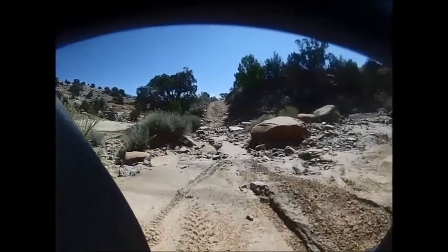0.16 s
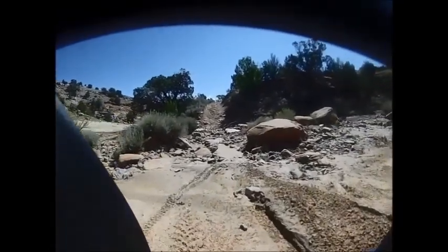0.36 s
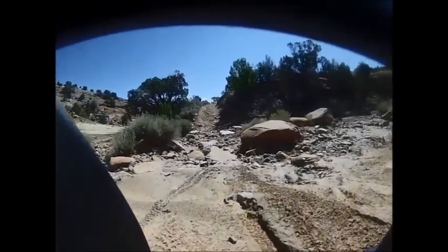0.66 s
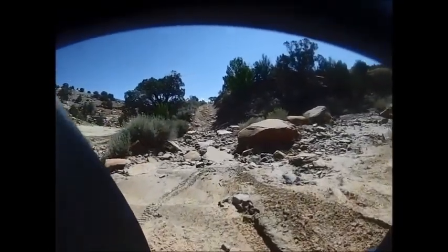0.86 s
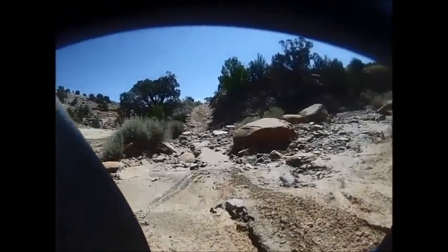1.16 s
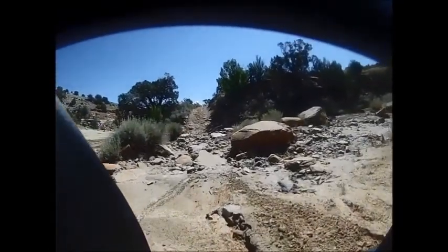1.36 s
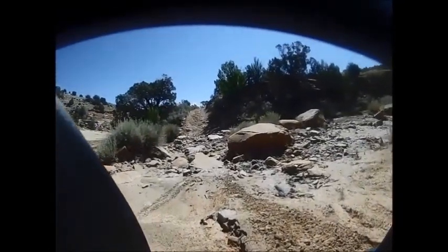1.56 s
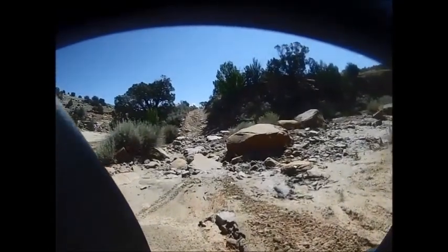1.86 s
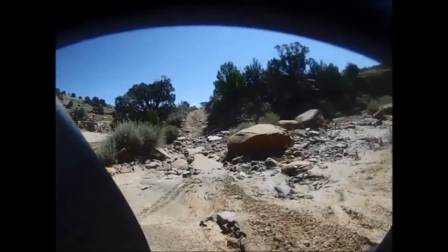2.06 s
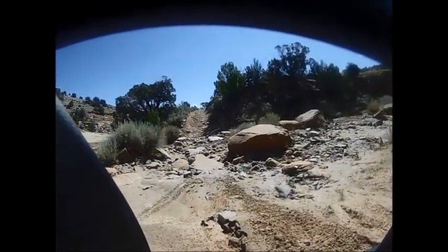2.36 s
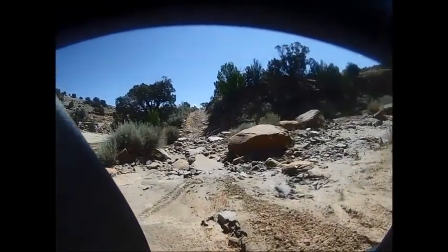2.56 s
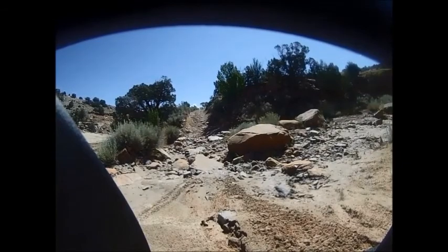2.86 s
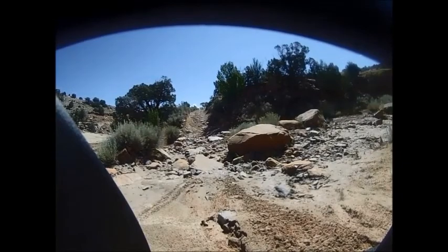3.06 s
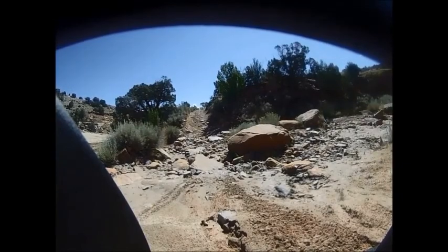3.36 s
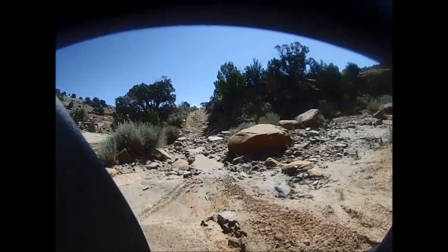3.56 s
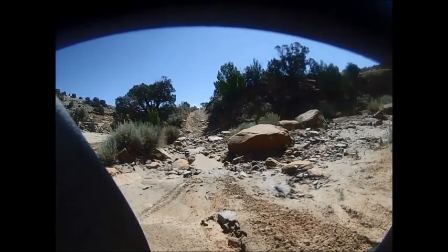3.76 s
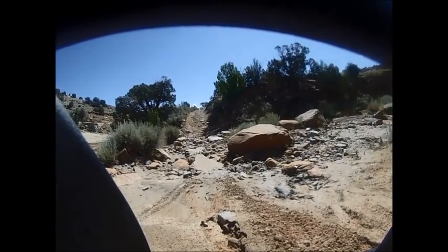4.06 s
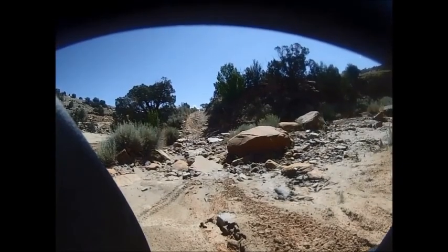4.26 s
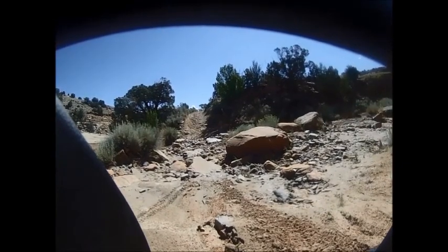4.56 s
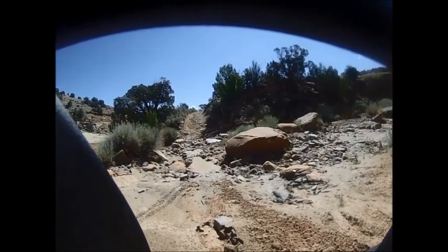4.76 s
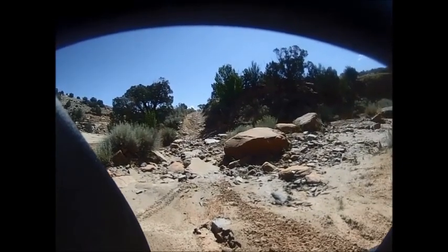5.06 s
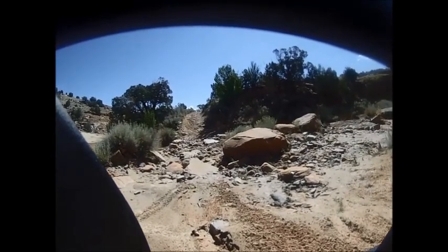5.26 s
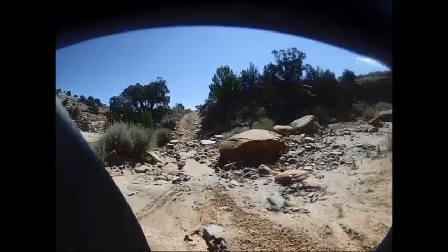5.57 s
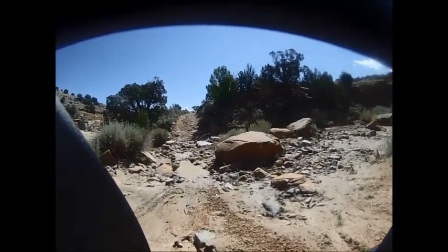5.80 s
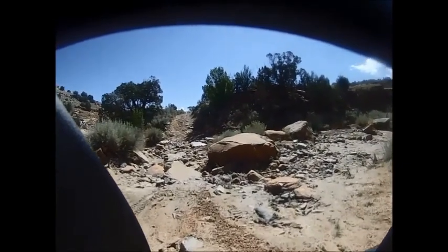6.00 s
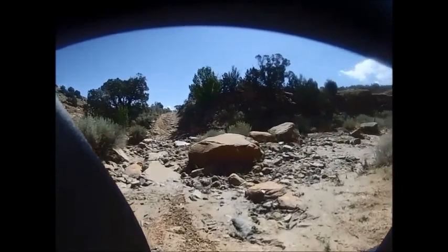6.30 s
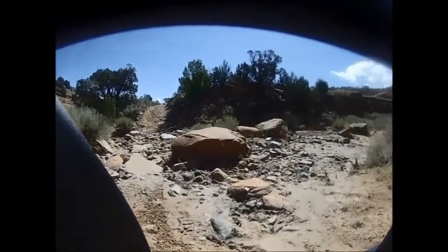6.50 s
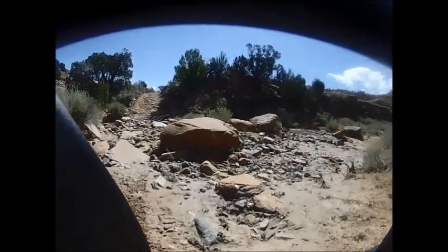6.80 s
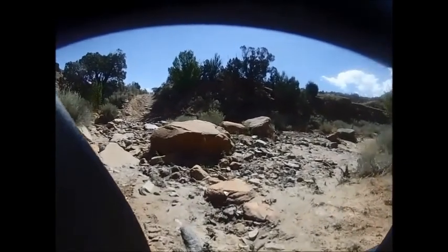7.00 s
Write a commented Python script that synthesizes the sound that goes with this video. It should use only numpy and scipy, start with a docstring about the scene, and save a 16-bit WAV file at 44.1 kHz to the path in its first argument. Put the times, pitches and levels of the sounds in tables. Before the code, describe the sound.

An off-road vehicle crawls along a rocky dry wash, heard from on board. For the first 3.6 seconds its engine putters near idle with low, lumpy exhaust pulses, light ticking and clatter, and an uneven rumble from rolling over the ground. At about 3.7 seconds the engine rises in pitch and gets much louder, with a shudder and a dull double clunk just after 4 seconds. It pulls with a deep drone until about 6.3 seconds, while rapid knocks from the drive keep time with it. Two small stones snap under the tyres at about 6.1 and 6.3 seconds. From 6.2 to 6.5 seconds the knocking turns harder and brighter as the revs drop with another shudder. A few loose clunks and scattered knocks follow around 6.6 to 6.7 seconds, and the engine is back to a low putter by 7 seconds.

```python
"""A twin-cylinder off-road vehicle crawls along a rocky wash, heard from on board.
Its exhaust putters near idle, pulls for 2.5 s with a deep drone, then falls back. The engine shakes
the bodywork, valve gear and drive clatter through the casing, and the frame rumbles over the ground.
Slack in the drive knocks in step with the engine under load, harder and brighter as it slows.
The running gear clunks as the load comes and goes; two stones snap under the tyres."""
import sys
import numpy as np
from scipy import signal
from scipy.fft import rfft, irfft, next_fast_len
from scipy.io import wavfile
from scipy.ndimage import uniform_filter1d, minimum_filter1d, map_coordinates

SR = 44100
rng = np.random.default_rng(int(sys.argv[2]) if len(sys.argv) > 2 else 0)


def inscribe(sig):
    """Save sig as 16-bit PCM at rate SR to the path in sys.argv[1].

    A 1-D sig is mono; a 2-D sig holds one channel per row.
    Samples are clipped to [-1, 1] before scaling.
    """
    pcm = np.round(np.clip(np.atleast_2d(sig).T, -1, 1) * 32767)
    wavfile.write(sys.argv[1], SR, pcm.astype(np.int16))


N = 314874
TIME = np.arange(N) / SR


def amp(db):
    """Decibels to gain."""
    return 10 ** (np.asarray(db) / 20)


def unit(x):
    """Scale to rms 1."""
    return x / np.sqrt(np.mean(x ** 2) + 1e-20)


def curve(points):
    """(t/s, value) points to one value per sample."""
    return np.interp(TIME, *np.transpose(points))


def swells(events):
    """Gaussian bumps in dB from (t/s, width/s, lift/dB) rows."""
    return sum(db * np.exp(-.5 * ((TIME - s) / width_s) ** 2) for s, width_s, db in events)


def wobble(rate_hz):
    """Smooth random curve, rms about 1."""
    knots = rng.standard_normal(int(N * rate_hz / SR) + 4)
    return np.interp(TIME, TIME[::64], map_coordinates(knots, [TIME[::64] * rate_hz]))


def gate(cycle, moments):
    """Gaussian bumps that recur every engine cycle."""
    return sum(size * np.exp(-.5 * (((cycle - phase + .5) % 1 - .5) / width) ** 2)
               for phase, width, size in moments)


def once_a_cycle(cycle, phase):
    """Times in s at which the engine passes one phase of its cycle."""
    return np.interp(np.arange(int(cycle[-1])) + phase, cycle, TIME)


def ring(x, colour, modes=(), size=8192):
    """Minimum-phase body: a (f/Hz, level/dB) colour plus resonance peaks."""
    hz = np.fft.rfftfreq(size, 1 / SR)
    colour_hz, colour_db = np.transpose(colour)
    gain_db = np.interp(np.log(hz + 1), np.log(colour_hz), colour_db)
    gain_db += sum(db / (1 + (2 * (hz - centre) / width) ** 2) for centre, width, db in modes)
    cepstrum = irfft(np.log(amp(gain_db)))
    cepstrum[1:size // 2] *= 2
    cepstrum[size // 2 + 1:] = 0
    return signal.fftconvolve(x, irfft(np.exp(rfft(cepstrum))))[:N]


# casing and bodywork resonances: f/Hz, width/Hz, lift/dB
CASING_MODES = [(303.1, 11, 9.5), (554, 20, 6), (748, 37, 4), (998.6, 63, 9.5), (1187, 59, 6.5),
                (1356, 150, 6.5), (1575, 76, 7), (1755.5, 116, 13.5), (2046, 69, 8), (2226, 190, 7.5),
                (2643, 20, 10), (3610, 32, 8), (4223, 73, 11), (4340, 156, 14), (4576, 110, 12.5),
                (5330, 95, 9.5), (6000, 75, 0.5), (6900, 60, -0.5)]


def casing(x, colour, tune=1):
    """Casing and bodywork ring at their resonances, scaled in pitch by tune; rms 1."""
    modes = [(tune * hz, width_hz, db) for hz, width_hz, db in CASING_MODES]
    return unit(ring(x, colour, modes))


def puffs(cycle, orders, levels_db, crest_phase, spread, smear, uneven_db, jitter_cycles):
    """Uneven exhaust pulses: low orders crest together, pipe reflections smear the higher ones."""
    pressure = 0
    phase = cycle - crest_phase + jitter_cycles * wobble(22)
    for k, db in zip(orders, levels_db):
        lag = spread * max(k - 4, 0) ** 2 + smear * max(k - 7, 0) ** 2
        size = amp(db + uneven_db * np.sqrt(k) * np.tanh(wobble(7.5)))
        pressure += size * np.cos(2 * np.pi * (k * phase - lag))
    return unit(pressure)


# exhaust harmonics: order of the cycle rate, rolling idle/dB, held idle/dB, open throttle/dB
EXHAUST_ORDERS = [(2, -24.5, -26.5, 6), (3, -26.5, -7.5, -5), (4, 5.5, 3.5, 3.5), (5, 0, -12, -5),
                  (6, -4, -6, -17), (7, -11, -4.5, -22), (8, -12.5, -7.5, -20.5), (9, -25, -14.5, -26.5),
                  (10, -28.5, -14.5, -25.5), (11, -15.5, -14.5, -23.5), (12, -21.5, -21, -24.5),
                  (13, -33, -32.5, -28), (14, -18.5, -26.5, -31.5), (15, -28, -15, -24.5),
                  (16, -28, -14.5, -24.5), (17, -32, -28.5, -32.5), (18, -34.5, -26.5, -27.5)]


def exhaust(cycle, throttle, held):
    """Lumpy suction pulses at idle, gruffer when held back; firm, even pushes under load."""
    orders, rolling_db, held_db, open_db = np.transpose(EXHAUST_ORDERS)
    idle_db = (rolling + held * (braked - rolling) for rolling, braked in zip(rolling_db, held_db))
    idle = -puffs(cycle, orders, idle_db, crest_phase=0.3518, spread=0.012, smear=0.212,
                  uneven_db=1.15, jitter_cycles=0.005)
    pull = puffs(cycle, orders, open_db, crest_phase=0.5496, spread=0.0081, smear=0.23,
                 uneven_db=0.3, jitter_cycles=0.0015)
    return ((1 - throttle) * idle + throttle * pull) / np.hypot(1 - throttle, throttle)


# spectra of the bodywork drone and the gas turbulence: f/Hz, level/dB
DRONE_COLOUR = [(60, -28), (110, -8), (150, -5.5), (220, 0.5), (260, -0.5), (350, -4.5), (430, -5.5),
                (520, -14.5), (580, -15), (700, -24.5), (1200, -73), (3000, -110)]
GAS_COLOUR = [(60, -20), (110, -8), (160, 0), (230, 1.5), (280, -3.5), (350, -5.5), (430, -7), (520, -19.5),
              (700, -24.5), (1200, -67.5), (3000, -110)]


def boom(cycle, shudder_db, rumble_gain=0.79, waver_db=6.0, jitter_cycles=0.002):
    """High engine orders shake the bodywork, over a turbulent rumble that surges with each shudder."""
    shaft = cycle + jitter_cycles * wobble(20)
    drone = 0
    for order in range(19, 47):
        size = amp(waver_db * np.tanh(wobble(6.5)))
        drone += size * np.cos(2 * np.pi * (order * shaft + rng.random()))
    rumble = amp(shudder_db) * casing(rng.standard_normal(N), GAS_COLOUR)
    return (casing(drone, DRONE_COLOUR) + rumble_gain * rumble) / np.hypot(1, rumble_gain)


def panel_hum(cycle, cycle_hz, held, order=24, panel_hz=304, width_hz=28, hum_db=-50, held_db=2.5):
    """A panel sings while idle speed keeps one engine order near its resonance."""
    nearness = 1 / (1 + ((order * cycle_hz - panel_hz) / width_hz) ** 2)
    level = amp(hum_db + held_db * held + 3 * np.tanh(wobble(7)))
    shaft = cycle + 0.0025 * wobble(12)
    return level * nearness * np.sqrt(2) * np.cos(2 * np.pi * order * shaft)


def wavering_casing(x, colour, detune=0.015):
    """The casing's ring wavers between slightly sharp and slightly flat; rms 1."""
    share = .5 + .5 * np.tanh(2 * wobble(9))
    return unit(share * casing(x, colour, 1 + detune) + (1 - share) * casing(x, colour, 1 - detune))


# clatter bursts at the firings and the dead centres: phase/cycles, width/cycles, strength
FIRINGS = [(0.075, 0.11, 0.33), (0.515, 0.091, 0.34)]
DRIVE_CHATTER = [(.02, 0.11, 0.4), (0.268, 0.05, 0.72), (.53, 0.05, 0.93), (0.811, 0.067, 0.43)]
# clatter spectra at idle and under load: f/Hz, level/dB
IDLE_COLOUR = [(200, -28), (450, -1.5), (620, -8), (780, -1.5), (1100, -3), (1600, -2), (1950, -10),
               (2300, -9), (2800, -9.5), (3700, -23.5), (4400, -30.5), (5200, -38.5), (8000, -38.5),
               (15000, -49)]
LOAD_COLOUR = [(200, -26.5), (450, -27), (620, -10), (780, -3.5), (1100, -10.5), (1350, -2.5), (1650, -6.5),
               (1950, -13.5), (2700, -10), (3100, -15), (3900, -27.5), (7300, -35.5), (8300, -44),
               (15000, -58.5)]


def clatter(cycle, throttle, grain_db=1.1, idle_db=-0.44, load_db=-2.5, slack_throttle=0.22):
    """Dense small impacts of valve gear and drive: at the firings idling, at dead centres under load."""
    impacts = rng.standard_normal(N) * amp(grain_db * wobble(600))
    idle = amp(idle_db) * wavering_casing(impacts * (0.38 + gate(cycle, FIRINGS)), IDLE_COLOUR)
    pull = amp(load_db) * wavering_casing(impacts * (0.6 + gate(cycle, DRIVE_CHATTER)), LOAD_COLOUR)
    load = np.clip((throttle - slack_throttle) / (1 - slack_throttle), 0, 1)
    return (1 - load) * idle + load * pull


# valve seatings: phase/cycles, relative level/dB
SEATINGS = [(.005, -4.5), (.135, 2.5), (.385, -2), (.56, 1)]
# tick spectrum: f/Hz, level/dB
TAPPET_COLOUR = [(300, -30.5), (800, 1.5), (1600, 3), (2000, 0), (2700, -8), (3700, -22), (5200, -29.5),
                 (8000, -35.5), (15000, -47)]


def tappets(cycle, rms_db=-50, scatter_db=2, jitter_s=0.0009):
    """Each valve seats with a small, bright tick that rings the casing."""
    ticks = np.zeros(N)
    for phase, db in SEATINGS:
        times_s = once_a_cycle(cycle, phase)
        times_s += jitter_s * rng.standard_normal(len(times_s))
        samples = np.clip((times_s * SR).astype(int), 0, N - 1)
        ticks[samples] += amp(db + scatter_db * rng.uniform(-0.83, 1, len(samples)))
    return amp(rms_db) * casing(ticks, TAPPET_COLOUR)


# gas bursts at the valves: phase/cycles, width/cycles, strength
VALVE_BURSTS = [(0.428, 0.039, 0.48), (0.561, 0.2, 0.32), (.94, 0.059, 0.52)]
# hiss spectrum: f/Hz, level/dB
HISS_COLOUR = [(2500, -34), (3750, -5.5), (4300, 2), (6000, 0), (7450, -5), (7950, -12), (15000, -20.5)]


def valve_hiss(cycle, throttle, bed=0.44, hiss_db=-68, throttle_db=3):
    """Gas sizzles as the valves open and close."""
    gas = rng.standard_normal(N) * (bed + gate(cycle, VALVE_BURSTS))
    return amp(hiss_db + throttle_db * throttle) * unit(ring(gas, HISS_COLOUR))


def chassis(rumble_db=-39, lumps_db=5.5):
    """The frame rumbles as the tyres roll over uneven ground."""
    colour = [(18, -21.5), (32, -3), (55, 11), (95, 1), (140, -9), (300, -46.5), (1000, -110)]
    return amp(rumble_db + lumps_db * wobble(4.9)) * unit(ring(rng.standard_normal(N), colour))


def strikes(events, colour, grit, grit_t60_s, rebound, rebound_s):
    """Each contact is a clean blow, a quick rebound and decaying grit, ringing one body."""
    t = np.arange(1024) / SR
    response = ring(np.ones(1), colour)[:len(t)]
    force = np.zeros(N + SR)
    for s, db in events:
        blow = grit * rng.standard_normal(len(t)) * amp(-60 * t / grit_t60_s)
        blow[0] += 1
        blow[int(rebound_s * SR)] += rebound
        force[int(s * SR):][:len(t)] += amp(db) * blow
    return signal.fftconvolve(force, response / np.abs(response).max())[:N]


# running gear blows: t/s, level/dB
CLUNKS = [(4.039, -30.5), (4.089, -20), (6.617, -23.5), (6.702, -18.5), (6.718, -24)]
# clunk spectrum: f/Hz, level/dB
CLUNK_COLOUR = [(100, -10.5), (310, 1), (700, -5), (1000, -7), (1290, 7.5), (1700, 0), (2200, -5),
                (3200, -20), (4500, -21), (8000, -47.5)]


def clunks():
    """Dull, loose blows from the running gear as the load comes on and goes off."""
    return strikes(CLUNKS, CLUNK_COLOUR, grit=0.06, grit_t60_s=0.035, rebound=0.4, rebound_s=0.003)


# once-a-cycle knocks near a dead centre: start/s, end/s, phase/cycles, level/dB
KNOCK_RUNS = [(4.12, 5.0, .765, -18.7), (4.16, 5.06, .495, -15.3), (5.06, 5.75, .487, -16.3),
              (4.68, 4.92, .225, -20.5), (5.2, 5.5, .21, -23.5), (5.5, 5.75, .21, -19.5),
              (5.5, 5.76, .0, -19.5), (5.5, 5.75, .7, -21), (5.75, 5.92, .703, -15.5),
              (5.82, 5.97, .0, -19.5), (5.92, 6.2, .733, -18.2), (6.0, 6.18, .25, -22)]
# harder and softer spells in those runs: t/s, width/s, lift/dB
KNOCK_ACCENTS = [(4.17, 0.024, -4.5), (4.55, 0.011, 1), (4.66, 0.024, 2.5), (4.82, 0.046, -3),
                 (5.0, 0.032, 1.5), (5.21, 0.04, -6.5), (5.35, 0.062, 2.5), (5.945, 0.012, -2.5)]
# harder knocks, still in step with the slowing engine, then a few scattered ones: t/s, level/dB
OVERRUN_KNOCKS = [(6.103, -17.5), (6.215, -13), (6.241, -13), (6.253, -26), (6.265, -11.5), (6.28, -15.5),
                  (6.293, -14), (6.308, -24), (6.319, -16.5), (6.334, -15.5), (6.35, -17), (6.365, -12),
                  (6.408, -12.5), (6.426, -16.5), (6.456, -25), (6.533, -30), (6.569, -16.5), (6.6, -26),
                  (6.635, -21), (6.651, -23), (6.666, -20), (6.704, -21), (6.733, -24), (7.122, -21.5)]
# knock spectrum, and the added brightness on the overrun: f/Hz, level/dB
KNOCK_COLOUR = [(300, -33), (740, -1.5), (880, -10), (1100, -12.5), (1300, 0), (1480, -2.5), (1720, 0),
                (2050, -10), (2400, -2), (2620, 3), (2770, 0), (2950, -19.5), (3230, -12), (3450, -22.5),
                (3750, -39.5), (5400, -32.5), (7000, -57), (15000, -90)]
OVERRUN_LIFT = [(2800, -1.5), (3400, 0), (4500, 4.5), (5600, 0.5), (7200, 8.5), (9000, 2)]


def drive_knocks(cycle):
    """Slack in the drive is taken up in step with the engine, harder and brighter on the overrun."""
    accent_db = swells(KNOCK_ACCENTS)
    load_knocks = [(s, db + accent_db[int(s * SR)]) for start_s, end_s, phase, db in KNOCK_RUNS
                   for s in once_a_cycle(cycle, phase) if start_s < s < end_s]
    contact = dict(grit=0.04, grit_t60_s=0.025, rebound=0.12, rebound_s=0.0023)
    under_load = strikes(load_knocks, KNOCK_COLOUR, **contact)
    overrun = strikes(OVERRUN_KNOCKS, KNOCK_COLOUR, **contact)
    return under_load + ring(overrun, OVERRUN_LIFT)


# stone snaps: t/s, level/dB
STONES = [(6.062, -32), (6.341, -42)]


def stones():
    """Stones snap under the tyres, bright and dry."""
    colour = [(1500, -24), (3200, -2), (3900, 9), (4600, 6), (5300, -15), (10000, -25), (15000, -42.5)]
    return strikes(STONES, colour, grit=0.12, grit_t60_s=0.025, rebound=0.3, rebound_s=0.0007)


# four-stroke cycle rate: t/s, f/Hz
CYCLE_RATE = [(0, 13.4), (.6, 12.62), (1.3, 13.06), (2.2, 12.48), (2.9, 12.92), (3.45, 12.79),
              (3.78, 14.16), (4.0, 17.6), (4.25, 19.01), (4.95, 19.08), (5.3, 19.93), (6.22, 20.14),
              (6.42, 15.96), (6.87, 12.79), (7.14, 12.47)]
# throttle: t/s, opening/0-1
THROTTLE = [(0, 0.35), (3.6, 0.08), (3.73, 0.6), (4.15, 0.77), (5.2, 0.83), (6.28, 1), (6.37, 0.5),
            (6.43, 0.58), (6.65, 0.24), (7.14, 0.4)]
# vehicle held almost still against the rocks: t/s, share/0-1
HELD = [(1.3, 0.2), (1.9, 0.8), (3.6, 0.85), (4.2, 0.1), (6.5, 0), (7.0, 0.3)]
# exhaust swells and sags as the engine labours over uneven ground: t/s, width/s, lift/dB
LABOURS = [(0.08, 0.068, 0), (0.75, 0.084, 1.5), (1.2, .1, -2), (1.59, 0.03, 1.5), (2.04, 0.031, 2),
           (2.22, 0.1, 2.5), (2.62, 0.053, 1.5), (3.33, 0.046, 4), (3.8, 0.098, 0), (4.0, 0.032, -4.5),
           (4.15, 0.044, -1.5), (4.74, 0.073, -0.7), (5.27, 0.17, 1), (6.365, .016, -6), (6.52, 0.024, -2)]
# drive shudders on taking up and shedding load: t/s, width/s, rumble lift/dB
SHUDDERS = [(4.06, 0.078, 9.5), (6.41, 0.044, 11.5)]


def scene(idle_hz=12.8):
    """One crankshaft and one throttle drive the engine layers, over running gear and ground sounds."""
    cycle_hz, throttle, held = curve(CYCLE_RATE), curve(THROTTLE), curve(HELD)
    cycle = np.cumsum(cycle_hz) / SR
    above_idle_hz = cycle_hz - idle_hz
    shudder_db = swells(SHUDDERS)
    stumble_db = 0.23 * shudder_db * wobble(30)  # uneven firing during a shudder
    exhaust_db = -27 + 0.99 * above_idle_hz + 10.93 * throttle + swells(LABOURS) + stumble_db
    boom_db = -48 + 2.12 * above_idle_hz + throttle
    clatter_db = -41.5 + 1.16 * above_idle_hz + 0.98 * throttle + 0.29 * shudder_db
    pipe = amp(exhaust_db) * exhaust(cycle, throttle, held)
    bodywork = amp(boom_db) * boom(cycle, shudder_db) + panel_hum(cycle, cycle_hz, held)
    mechanics = amp(clatter_db) * clatter(cycle, throttle) + tappets(cycle) + valve_hiss(cycle, throttle)
    return (pipe + bodywork + mechanics + drive_knocks(cycle) + clunks() + chassis() + stones())[None]


def record(dry, floor_db=-82, ceiling_db=-4.0, hold_s=0.014, low_cut_hz=23, top_hz=15650):
    """Peak limiter, faint steady hiss and band limits."""
    hold = int(hold_s * SR)
    needed_gain = np.minimum(1, amp(ceiling_db) / (np.abs(dry[0]) + 1e-9))
    gain = uniform_filter1d(minimum_filter1d(needed_gain, hold), hold)
    mix = gain * dry[0] + amp(floor_db) * rng.standard_normal(N)
    size = next_fast_len(N + 8192)
    hz = np.fft.rfftfreq(size, 1 / SR)
    band = (hz < top_hz) / np.hypot(1, (low_cut_hz / (hz + 1)) ** 10)
    return irfft(rfft(mix, size) * band, size)[None, :N]


dry = scene()
out = record(dry)
inscribe(out)
```